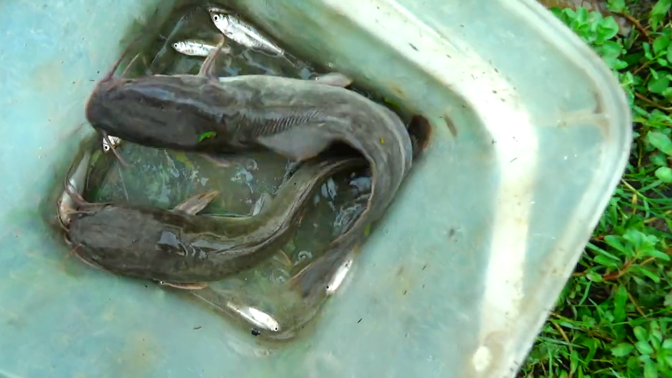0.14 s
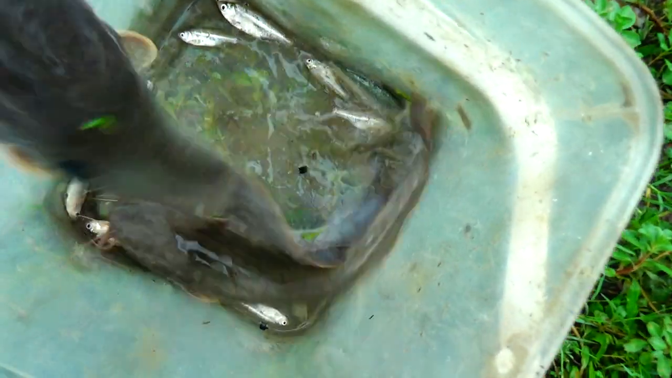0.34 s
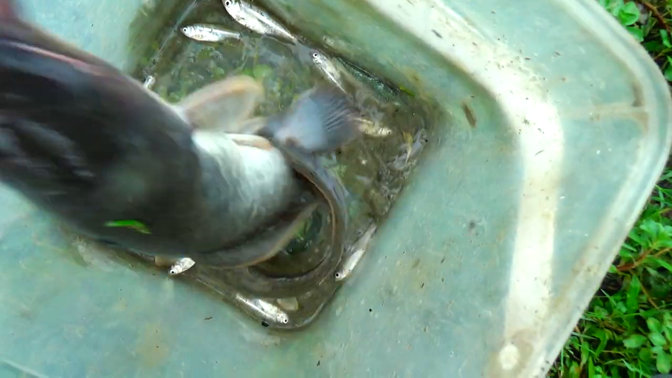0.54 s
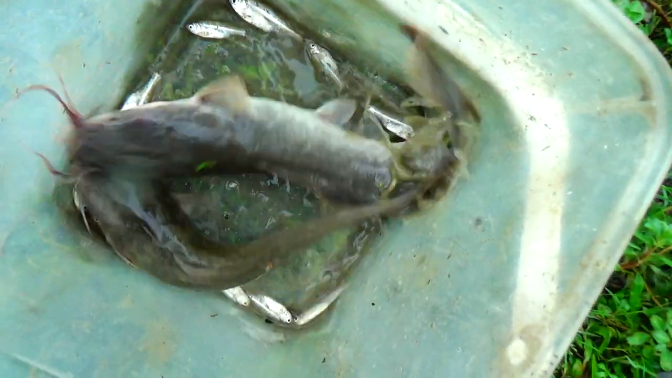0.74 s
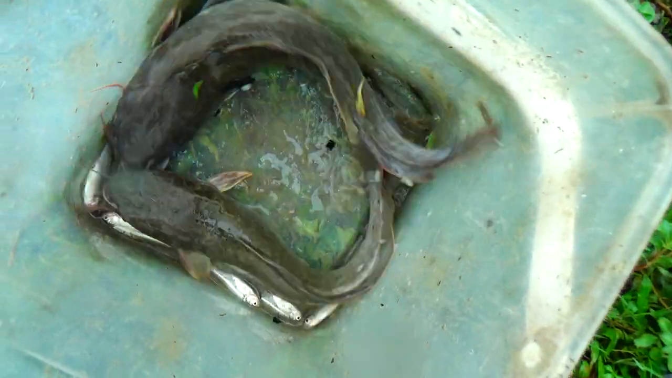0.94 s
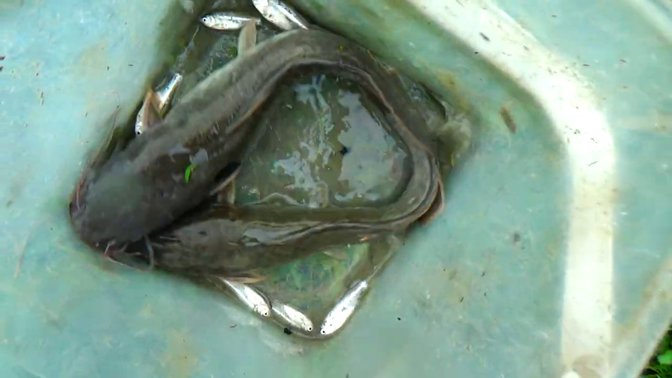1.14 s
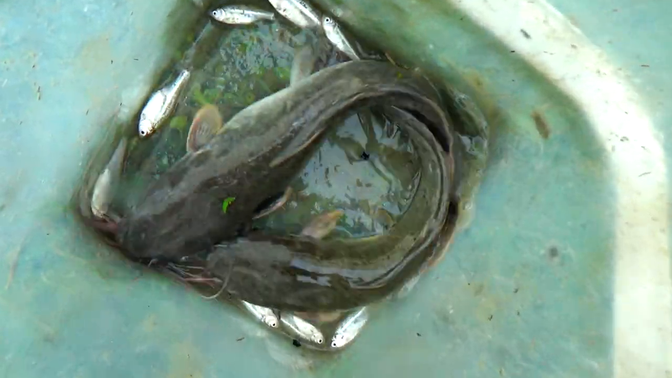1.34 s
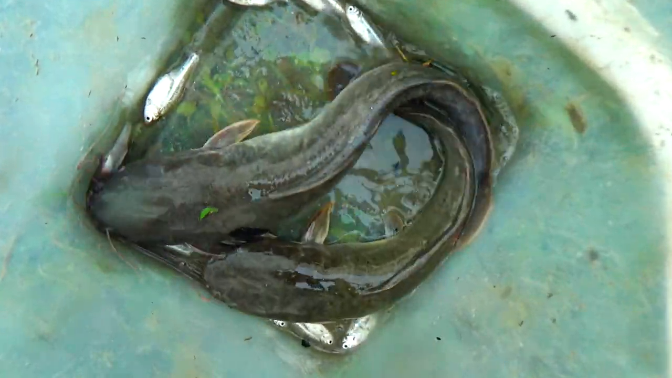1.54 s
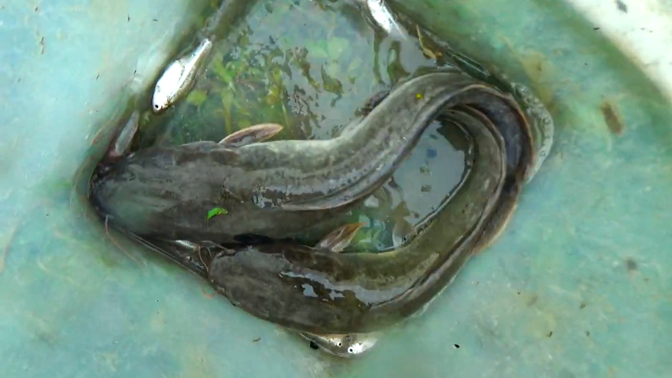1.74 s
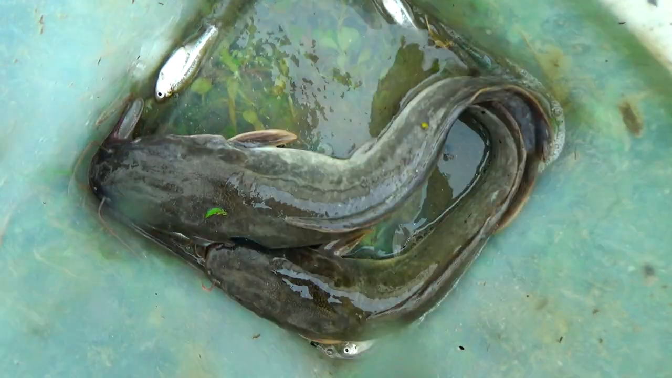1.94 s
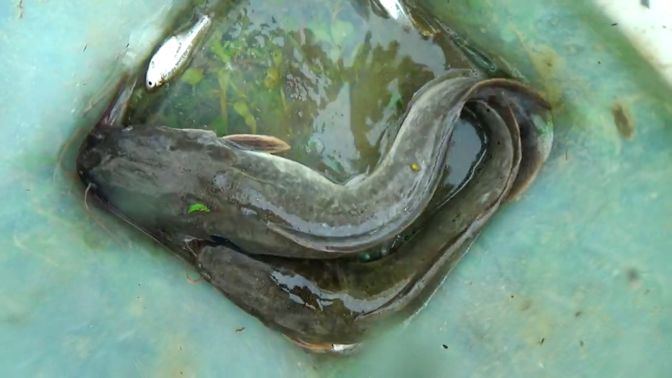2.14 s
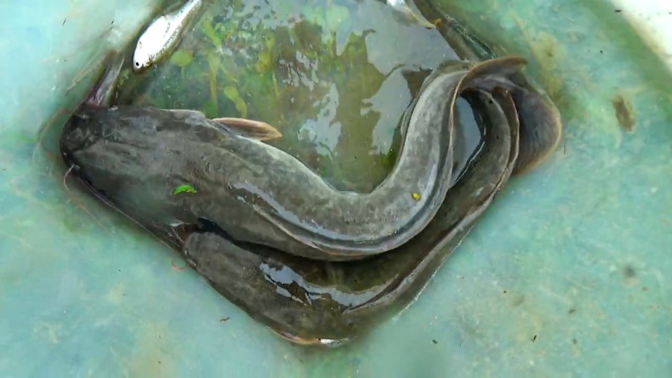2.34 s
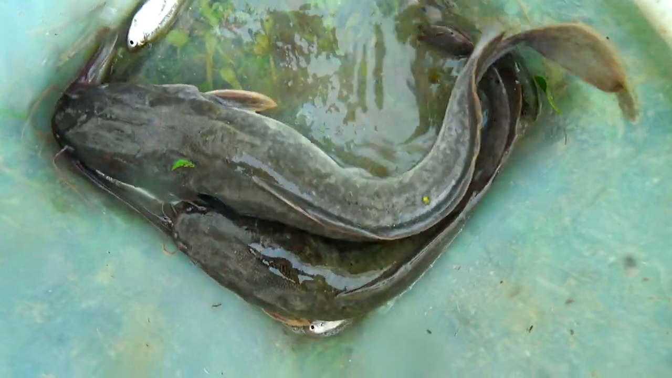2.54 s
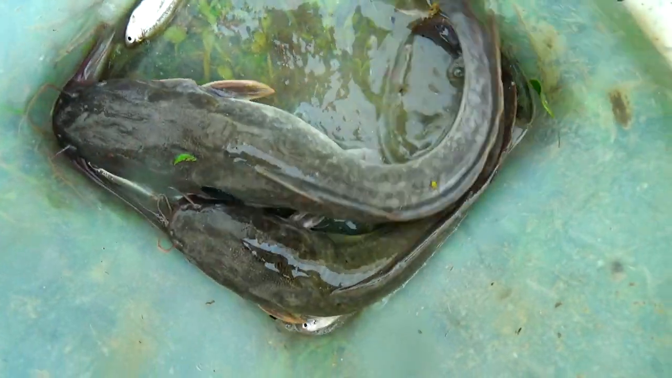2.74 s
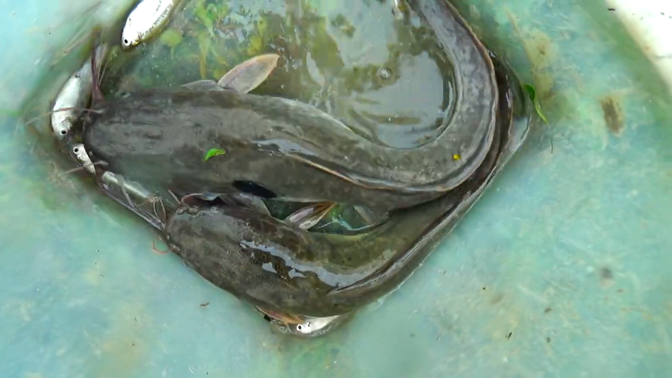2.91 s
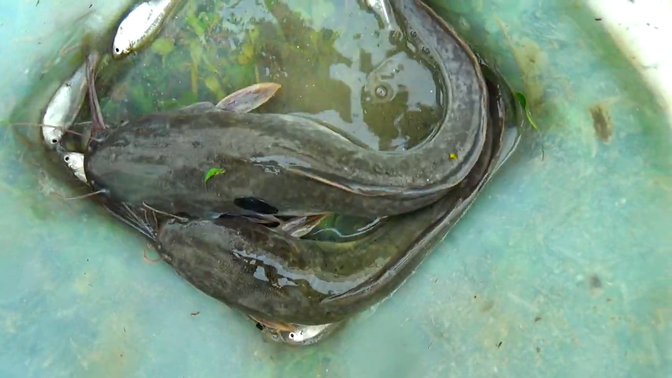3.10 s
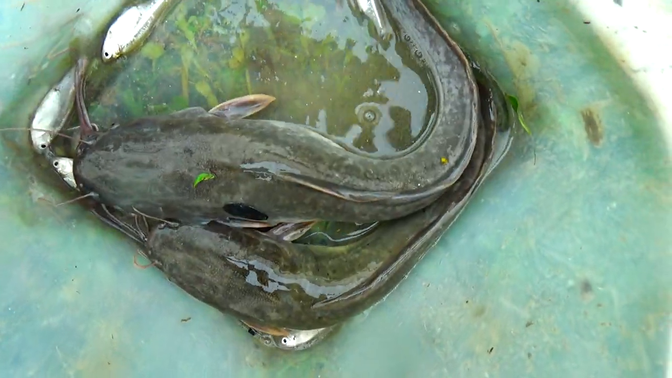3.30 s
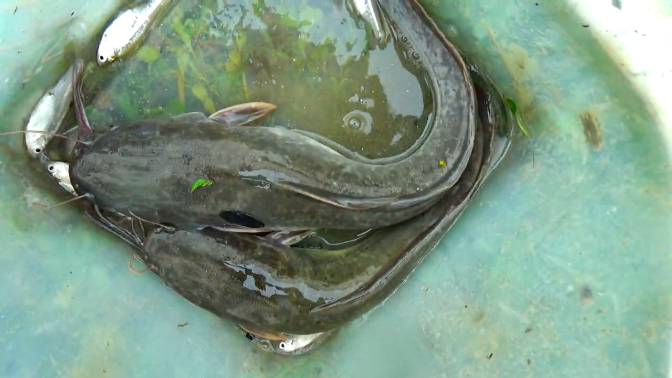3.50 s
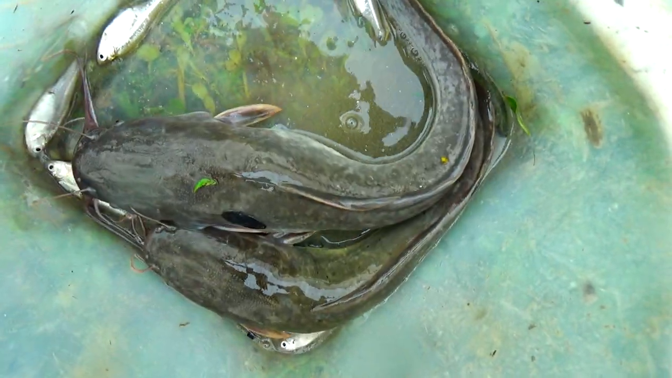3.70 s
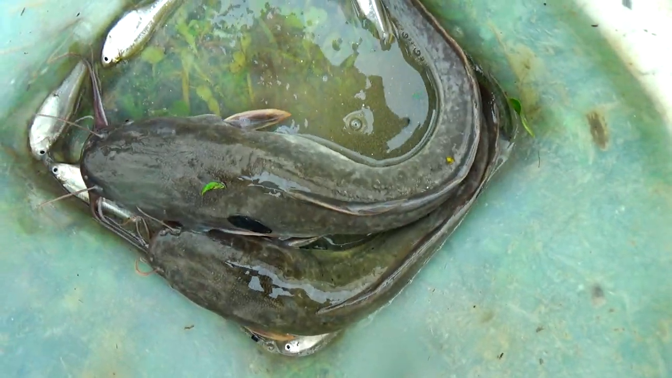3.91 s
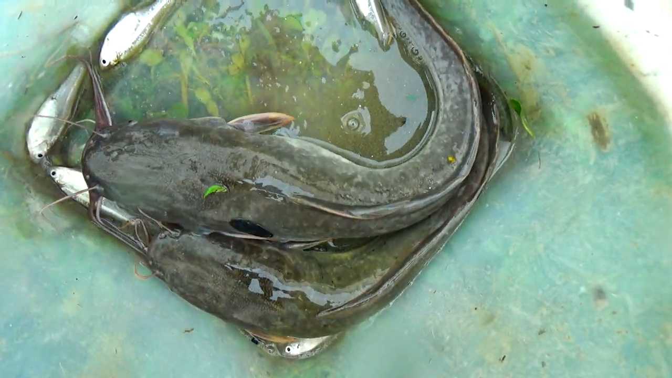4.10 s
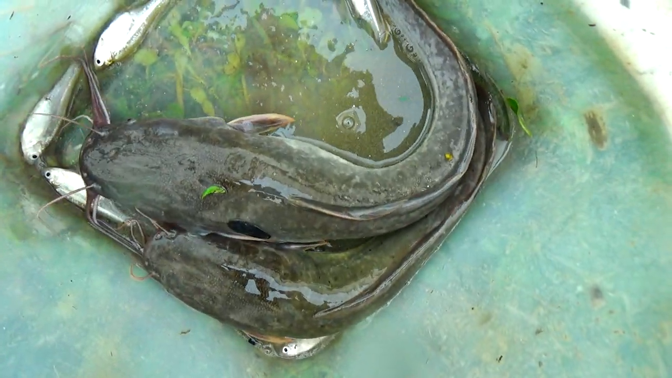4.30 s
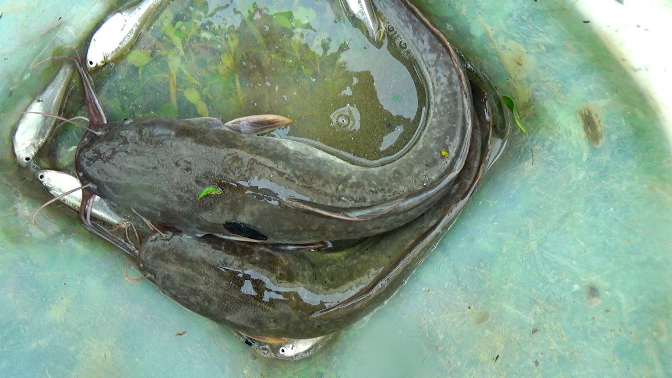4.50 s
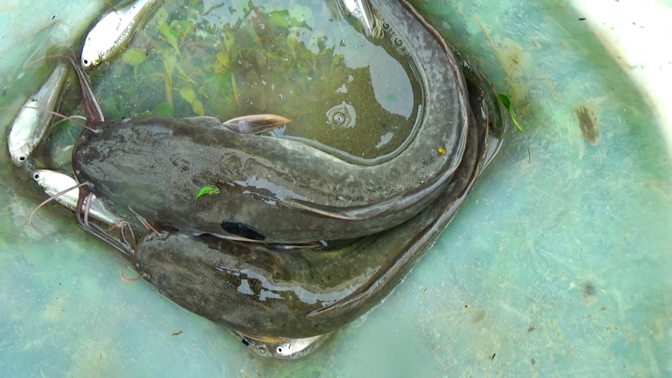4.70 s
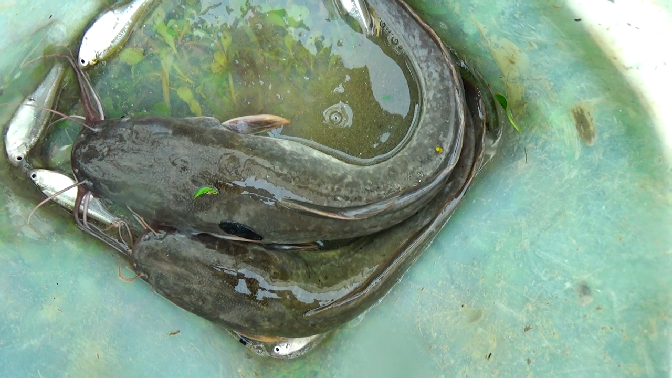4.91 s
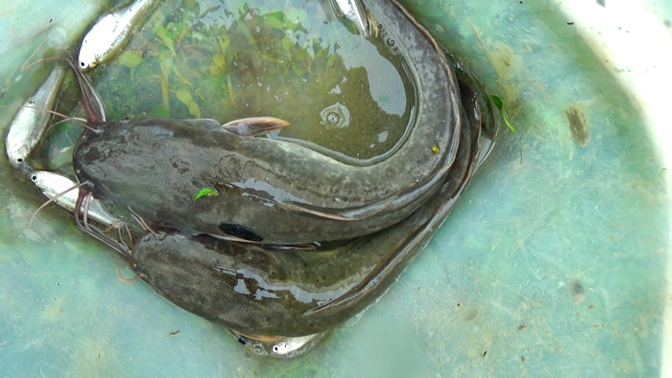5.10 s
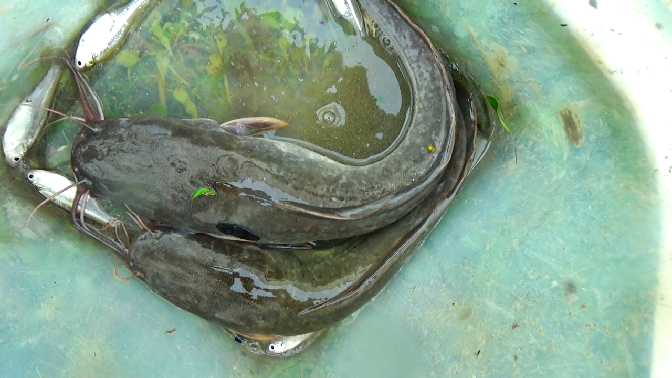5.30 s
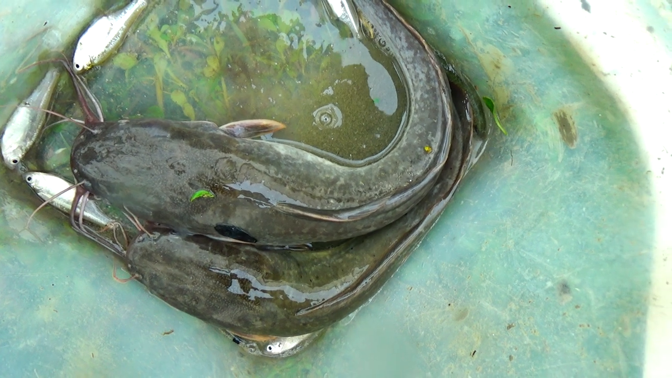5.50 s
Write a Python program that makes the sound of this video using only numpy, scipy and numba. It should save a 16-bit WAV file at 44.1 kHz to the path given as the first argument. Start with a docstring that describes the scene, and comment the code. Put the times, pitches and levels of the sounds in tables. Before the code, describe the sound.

Close stereo sound over a shallow plastic tub outdoors, about 5.5 seconds. Small wet clicks open, then at 0.18 a low, slightly left-leaning double thump begins the thrashing. From 0.25 to 0.95 come rapid sharp slaps, booming body hits, gurgles and bright bubbly spray, strongest around 0.3-0.4 and 0.6-0.85, with short boxy reflections. Drips patter and fade by 1.15, water running off into faint fizz. From 1.2 to 2.2 a bird, left of centre, sings five separate shaky gliding notes, then seven steeply falling whistles about every 0.22 seconds from 2.35 to 3.7, echoing from ground and trees; a very faint note follows at 3.9. A thin high insect chirps rapidly from about 1.2 onward. Small wet smacks come near 2.54 and 2.8-2.86, with a soft thump; fainter ticks near 3.6, 4.05 and 5.45. Quiet distant rumble and airy hiss continue throughout.

```python
"""A shallow plastic tub outdoors: two catfish thrash for a second, then settle with a few wet smacks and drips.
Their bodies thump the floor and trap air, which booms; torn water cracks and sprays as swarms of tiny bubbles,
each a short sine that rises in pitch, and all of them echo between the walls.
A bird sings gliding notes and a run of falling whistles, and an insect chirps, both shaky pure tones.
Behind them lies filtered noise: a low, distant rumble under airy hiss."""
import sys
import numpy as np
from scipy import signal
from scipy.fft import rfft, irfft
from scipy.io import wavfile
from scipy.ndimage import uniform_filter1d
from numba import njit

SR = 44100
rng = np.random.default_rng(int(sys.argv[2]) if len(sys.argv) > 2 else 0)


def file_out(sig):
    """Save sig as 16-bit WAV at sys.argv[1]."""
    # one column per channel
    cols = np.atleast_2d(sig).T
    # limit, then scale
    lim = np.clip(cols, -1, 1)
    pcm = np.round(lim * 32767).astype(np.int16)
    wavfile.write(sys.argv[1], SR, pcm)


N = 244755
T = np.arange(N) / SR  # time of every sample, s


def undb(db):
    """Turn decibels into a plain factor."""
    return 10 ** (np.asarray(db) / 20)


def unit(x):
    """Scale to an average strength (rms) of 1."""
    return x / np.sqrt(np.mean(x ** 2) + 1e-20)


def add(out, s, x):
    """Mix x into out from time s."""
    i = max(int(s * SR), 0)
    out[..., i:i + x.shape[-1]] += x[..., :N - i]


def pan(x, db):
    """Place a sound by its left minus right level."""
    return x * undb([[db / 2], [-db / 2]])


def band(x, lo_hz, hi_hz, order=2):
    """Keep the pitches between two limits."""
    limits_hz = [lo_hz, min(hi_hz, SR / 2 - 1)]
    return signal.sosfilt(signal.butter(order, limits_hz, "band", fs=SR, output="sos"), x)


def colour(x, points):
    """Filter by a curve of (pitch_hz, level_db) points."""
    hz, db = np.transpose(points)
    f = np.maximum(np.fft.rfftfreq(len(x), 1 / SR), 1)
    gain_db = np.interp(np.log(f), np.log(hz), db)
    return irfft(rfft(x) * undb(gain_db), len(x))


def walk(rate):
    """Smooth random wander around 0 with a spread near 1, drawing rate new values a second."""
    k = int(SR / rate)
    steps = np.repeat(rng.standard_normal(N // k + 1), k)
    return unit(uniform_filter1d(steps, k)[:N])


def diffuse(mid, side):
    """Left and right of a sound that arrives from all around, made of two unrelated noises."""
    # how much left and right differ, by pitch: pitch_hz [Hz], side_minus_mid_db [dB]
    side_curve = [(150, -21), (700, 1), (8100, -5), (15000, -16)]
    return mid + colour(side, side_curve) * np.array([[1], [-1]])


def echoes(x, t60, lag_s):
    """Dense reflections: noise that starts after lag_s and fades by 60 dB in t60 seconds, of about unit energy."""
    t = T[:SR]
    fading = rng.standard_normal((2, SR)) * undb(-60 * t / t60) * (t > lag_s)
    tail = diffuse(*unit(fading))
    return signal.fftconvolve(np.atleast_2d(x), tail / np.sqrt(SR), axes=1)[:, :N]


def tub_air(x):
    """The air between the walls rings on a few pitches when the water sounds excite it."""
    # ringing of the air: pitch_hz [Hz], t60_s [s to fade by 60 dB], level_db [dB at the centre pitch]
    air_modes = [(363, 0.03, 10), (880, 0.17, 2), (1797, 0.075, 4), (1940, 0.039, -1), (3130, 0.022, 5)]
    out = 0
    for hz, t60, db in air_modes:
        sharpness = hz * t60 * np.pi / np.log(1000)
        out = out + undb(db) * signal.lfilter(*signal.iirpeak(hz, sharpness, fs=SR), x)
    return out


@njit
def bubbles(length, start, hz, cycles, size, glide):
    """Sines that swell quickly and rise in pitch as they die; size sets their energy."""
    out = np.zeros(length)
    for k in range(len(start)):
        n, first, phase = int(cycles[k] * SR / hz[k]) + 2, int(start[k] * SR), 0.
        for i in range(min(n, length - first)):
            age = i / n
            phase += 2 * np.pi * hz[k] * (1 + glide * (age - 1 / 4)) / SR
            swell = age * age * np.exp(-11. * age)
            out[first + i] += size[k] * np.sin(phase) * swell / np.sqrt(n)
    return out


def cloud(length, start, lo_hz, hi_hz, cycles, scatter_db, glide=0.35):
    """Bubbles of random pitch, life and size at the given times."""
    pitch, life, size = rng.random((len(start), 3)).T
    hz = lo_hz * (hi_hz / lo_hz) ** pitch
    gain = undb(-scatter_db * np.log(1 - .99 * size))  # many small ones, few large
    return bubbles(length, start, hz, cycles * 4 ** (life - .5), gain, glide)


def plop(hz, ring_s, glide):
    """One bubble swells, rings for ring_s and rises in pitch by its glide; peak 1."""
    cycles = np.full(1, float(hz * ring_s))
    x = bubbles(SR // 10, np.zeros(1), np.full(1, float(hz)), cycles, np.ones(1), float(glide))
    return x / abs(x).max()


def note(hz, db, waver=.005, flutter_db=3.5):
    """A near-pure whistle along a pitch curve, its pitch and level slightly shaky."""
    shake = unit(band(rng.standard_normal(SR // 4), 22, 240))[:len(hz)]
    phase = 2 * np.pi * np.cumsum(hz * (1 + waver * shake)) / SR
    level = undb(db + flutter_db * shake[::-1])
    return np.sqrt(2) * np.sin(phase) * level * signal.windows.tukey(len(hz), .14)


def yard(yard_db=-47.5):
    """Nearly steady distant rumble under smooth air hiss, and a high hiss that swells twice."""
    # tone of the outdoor background: pitch_hz [Hz], level_db [dB per Hz, only the shape counts]
    yard_curve = [(20, -32), (43, -4), (149, -2.5), (249, -10.5), (340, -6), (463, -18), (1070, -23),
                  (4250, -34.5), (7800, -33.5), (9700, -32), (12000, -39), (15500, -42)]
    # swells of the high hiss: top_s [s at the top], half_width_s [s], level_db [dB at the top]
    hiss_swells = [(2.15, 0.22, -59), (3.45, 0.3, -62)]
    noises = (unit(colour(x, yard_curve)) for x in rng.standard_normal((2, N)))
    air = diffuse(*noises) * undb(yard_db + .5 * walk(12))
    swell = sum(undb(top_db) / (1 + ((T - s) / half_s) ** 2) for s, half_s, top_db in hiss_swells)
    hiss = unit(band(rng.standard_normal((2, N)), 9200, 10400, order=1))
    return air + diffuse(*hiss) * swell


def insect(level_db=-61.5, gap_s=0.018, period_s=.097, stroke_s=.013, top_hz=9200, end_hz=8600, count=52):
    """After a second, about ten uneven chirps a second, each two short wing strokes that slant down in pitch."""
    out = np.zeros(N)
    times = 1.15 + np.cumsum(period_s * rng.uniform(.65, 1.35, count))
    slant = np.linspace(top_hz, end_hz, int(stroke_s * SR))
    for s in times[times < T[-1] - 2 * gap_s]:
        for stroke in range(2):
            pitch, db = rng.normal([1, 0], [.008, 2])  # no two strokes quite alike
            add(out, s + stroke * gap_s, note(slant * pitch, db))
    return out * undb(level_db)


def gliding_notes(swell_db=11.5):
    """The bird's separate notes follow drawn pitch curves and swell over their first half."""
    # five opening notes and a faint last one: level_db [dB before colour and trim],
    # contour [list of time_s [s], pitch_hz [Hz]]
    gliding = [(-48, [(1.225, 4450), (1.25, 4150), (1.3, 3990), (1.32, 3050), (1.345, 2320)]),
               (-46, [(1.485, 4050), (1.52, 4360), (1.537, 3396), (1.565, 2430)]), (-40.5, [(1.695, 4460),
               (1.741, 4300), (1.751, 4800), (1.776, 4910), (1.795, 4130)]), (-41.5, [(1.915, 4170),
               (1.95, 4445), (1.972, 4820)]), (-39, [(2.132, 5300), (2.146, 4550), (2.178, 3914),
               (2.222, 1950)]), (-48, [(3.9, 1947), (3.97, 2120)])]
    out = np.zeros(N)
    for db, contour in gliding:
        s, hz = np.transpose(contour)
        at = np.arange(s[0], s[-1], 1 / SR)
        swell = swell_db * np.minimum(2 * np.linspace(0, 1, len(at)) - 1, 0)
        add(out, s[0], note(np.interp(at, s, hz), db + swell))
    return out


def falling_whistles(whistle_s=.082, drop_hz_per_s=100000, glide_hz=3325, sag_hz_per_s=18500):
    """Each whistle drops steeply from its top onto a slower glide, which starts at glide_hz and sags."""
    # the run of whistles: start_s [s], top_hz [Hz], level_db [dB before colour and trim]
    whistles = [(2.347, 5860, -41), (2.566, 4855, -42), (2.769, 5545, -42), (2.989, 5700, -42.5),
                (3.203, 4730, -43.5), (3.425, 4750, -45), (3.646, 4910, -44)]
    out, t = np.zeros(N), T[:int(whistle_s * SR)]
    for s, top_hz, db in whistles:
        above_hz = top_hz - glide_hz
        hz = glide_hz - sag_hz_per_s * t + above_hz * np.exp(-t * drop_hz_per_s / above_hz)
        add(out, s, note(hz, db, waver=.017))
    return out


def bird(level_db=-3, far_db=-5.0, near_db=-6.5):
    """Gliding notes and a run of falling whistles, thrown back by the ground and, duller, by the trees."""
    # some pitches of the song carry better than others: pitch_hz [Hz], level_db [dB]
    bird_colour = [(1950, -6), (2110, -15), (2280, 0.5), (2560, -3), (2750, 0), (3080, -5), (3280, 3.5),
                   (3520, -4.5), (3850, 5), (4500, -3), (5350, -10), (5750, -4)]
    song = colour(gliding_notes() + falling_whistles(), bird_colour)
    dulled = band(song, 20, 3700)
    trees = undb(far_db) * echoes(dulled, t60=2.4, lag_s=0.039)
    ground = undb(near_db) * echoes(song, t60=0.13, lag_s=0.0054)
    return undb(level_db) * (pan(song, -8.0) + ground + trees)


def froth(level_db=-56, fade_db_per_s=4, count=900):
    """Leftover foam fizzes away ever more quietly, as small bubbles at random times."""
    x = cloud(N, rng.uniform(0, T[-1], count), 4500, 12000, cycles=8, scatter_db=2.5)
    return unit(x) * undb(level_db - fade_db_per_s * T)


def drips(first_s=.83, last_s=1.14, level_db=-19, fade_db_per_s=62, count=24):
    """Flung water falls back as fine drips of uneven strength that grow fainter overall."""
    out = np.zeros(N)
    spacing_s = (last_s - first_s) / count
    for s, (early, pitch, size) in zip(np.linspace(first_s, last_s, count), rng.random((count, 3))):
        db = level_db - fade_db_per_s * (s - first_s) - 14 * size
        drip = plop(10000 - 7500 * pitch ** 2, .003, .15)
        add(out, s - early * spacing_s, undb(db) * drip)
    return out


def stir(attack_s=.01, drop_t60_s=.09, runoff_db=-12, runoff_t60_s=0.87):
    """Slosh and spray of all strokes: each swells, holds, drops quickly and runs off slowly."""
    # tail strokes that stir the water: start_s [s], length_s [s],
    # slosh_db and spray_db [dB, before the churn sets the balance]
    strokes = [(0.172, 0.1, -42.5, -43.5), (0.302, 0.16, -39.5, -30), (0.359, 0.042, -40, -26.5),
               (0.411, 0.09, -36, -39.5), (0.616, 0.066, -38.5, -21), (0.694, 0.053, -29.5, -24),
               (0.774, 0.057, -29.5, -26.5), (0.897, 0.073, -43, -44), (5.401, 0.013, -49, -55)]
    power = np.zeros((2, N))
    for s, length, slosh_db, spray_db in strokes:
        after = np.maximum(T - s - length, 0)
        drop = undb(-60 * after / drop_t60_s)
        runoff = undb(runoff_db - 60 * after / runoff_t60_s)  # water running back
        shape = np.clip((T - s) / attack_s, 0, 1) * np.maximum(drop, runoff)
        power += (undb([[slosh_db], [spray_db]]) * shape) ** 2
    return np.sqrt(power)


def churn(gurgle_db=-8, slosh_db=-7, spray_db=-6.0, medium_db=0, mist_db=-9, count=9000):
    """Stirred water gurgles, sloshes and sprays: rising bubbles of all sizes, the smaller in quick uneven spurts."""
    slosh, spray = stir()
    out = 0
    for side_db in (1.5, -1.5):  # two separate swarms, a little left and a little right
        start = rng.uniform(0, T[-1], count)
        deep = cloud(N, start[::10], 86, 535, cycles=6.4, scatter_db=2.5)
        large = cloud(N, start[::6], 520, 2600, cycles=8, scatter_db=3.5)
        medium = cloud(N, start[1::3], 1600, 6800, cycles=16, scatter_db=4)
        fine = cloud(N, start, 6100, 10150, cycles=22, scatter_db=4)
        mist = cloud(N, start, 10000, 14700, cycles=10, scatter_db=5)
        drops = unit(undb(medium_db) * unit(medium) + unit(fine) + undb(mist_db) * unit(mist))
        splash = unit(large) * slosh * undb(slosh_db) + drops * spray * undb(spray_db)
        splash = splash * undb(2.5 * walk(170))  # the spurts
        gurgle = unit(deep) * slosh * undb(gurgle_db)
        out = out + pan(splash, side_db) + pan(gurgle, 6.5 + side_db)
    return out


def plops(ring_s=.008, glide=0.16, level_db=-1):
    """Single drops and bubbles ring briefly and rise in pitch; one lasts and rings on a steady pitch."""
    # single drops and bursting bubbles, some in quick pairs:
    # start_s [s], level_db [dB before the overall trim], pitch_hz [Hz]
    single_plops = [(0.605, -12, 4440), (0.658, -13.5, 2560), (0.748, -13.5, 9600), (0.769, -21, 4570),
                    (0.816, -15, 3690), (0.847, -16.5, 6900), (0.8728, -13.5, 6150), (0.8735, -11, 8540),
                    (0.892, -22.5, 2418), (0.9472, -17, 9700), (0.958, -29.5, 1100), (1.389, -36, 2320),
                    (1.47, -33.5, 2030), (1.917, -36.5, 1870), (2.857, -26, 2900), (5.322, -39.5, 2060)]
    # a bubble that stays whole: start_s [s], level_db [dB], pitch_hz [Hz], life_s [s]
    lasting_bubble = (0.94, -41, 2940, .085)
    out = np.zeros(N)
    for s, db, hz in single_plops:
        add(out, s, undb(db + level_db) * plop(hz, ring_s, glide))
    s, db, hz, life_s = lasting_bubble
    add(out, s, undb(db) * plop(hz, life_s, 0))
    return out


def burst(lo_hz, hi_hz, cycles, spread_s, count):
    """A handful of bubbles of related size, born almost together; rms 1 if packed into 5 ms."""
    start = spread_s * rng.gamma(2, size=count) * np.linspace(.2, 1, count)
    centre = lo_hz * (hi_hz / lo_hz) ** rng.random()
    low, high = np.sqrt(lo_hz * centre), np.sqrt(hi_hz * centre)
    return unit(cloud(SR // 10, start, low, high, cycles, scatter_db=0.5)) / np.sqrt(20)


def smacks(crack_db=-2, large_db=-4, medium_db=-4.5, fine_db=-15, mist_db=-30, spread_s=.0025):
    """A water film tears: a sharp crack, then a burst of large, medium and fine bubbles and a little mist."""
    # wet smacks of skin and water: start_s [s], level_db [dB],
    # depth_db [dB: the deeper the water, the more big bubbles]
    smack_table = [(0.036, -13.5, -22), (0.0441, -15, -13.5), (0.1589, -26, 2), (0.2582, -12, -41),
                   (0.3148, -7.5, -31), (0.327, -8.5, -15.5), (0.3454, -6.5, -18), (0.3621, -20, -9),
                   (0.373, -6, -21), (0.4, -8.5, -23), (0.498, -16, -25), (0.5053, -10.5, -8.5),
                   (0.530, -14, -32), (0.538, -12, -30), (0.5577, -6.5, -19), (0.578, -13.5, -14),
                   (0.6031, -7.5, -25), (0.6279, -9, -29), (0.681, -7.5, -24), (0.7038, -8, -13.5),
                   (0.726, -10.5, -9), (0.7411, -8.5, -14), (0.7941, -8.5, -12), (0.801, -7, -29),
                   (0.8105, -14.5, -8.5), (0.919, -12.5, -28), (0.933, -14, -45), (0.9872, -13.5, -26),
                   (1.1473, -26, -12.5), (1.163, -27, -34), (1.522, -26.5, -15), (2.53, -30, -25),
                   (2.5402, -20.5, -20.5), (2.574, -36, -34), (2.799, -27, -36), (2.816, -22.5, -17.5),
                   (2.834, -29, -33), (2.858, -16, -27), (3.05, -32.5, -6), (3.594, -31.5, -31),
                   (4.0538, -28, -37), (5.01, -48.5, -1), (5.451, -43.5, 1), (5.459, -43, -36)]
    out = np.zeros((2, N))
    for s, db, depth in smack_table:
        tear_s = spread_s * undb(0.33 * db)  # a small film tears sooner
        x = undb(crack_db) * plop(rng.uniform(5500, 9000), .0014, 0)
        x += undb(depth + large_db) * burst(400, 2600, cycles=3.5, spread_s=2 * tear_s, count=10)
        x += undb(depth + medium_db) * burst(1460, 7300, cycles=8.5, spread_s=1.3 * tear_s, count=10)
        x += undb(fine_db) * burst(5600, 11200, cycles=9, spread_s=tear_s, count=10)
        x += undb(mist_db) * burst(6900, 16000, cycles=10, spread_s=tear_s, count=20)
        add(out, s, x * undb(db))
    return out


def thumps(t60=0.045, rise_s=0.0017, ring_db=-8, level_db=-1, left_db=6, push_s=0.0019, left_lag_s=0.00025):
    """Each blow squeezes a pocket of air, which booms; the deep, heavy ones also set the floor ringing most."""
    # bodies hitting the wet floor: start_s [s], level_db [dB before the overall trim],
    # pitch_hz [Hz, of the trapped air]
    blows = [(0.1835, -7.5, 150), (0.1908, -9, 332), (0.325, -13, 200), (0.335, -12, 121),
             (0.361, -18, 135), (0.432, -25, 112), (0.507, -16, 325), (0.57, -20, 325), (0.691, -17, 118),
             (0.741, -20, 355), (0.81, -12.5, 320), (0.838, -21, 130), (2.82, -22, 382), (4.231, -37, 300)]
    # the loaded tub floor: pitch_hz [Hz], t60_s [s to fade by 60 dB], level_db [dB before ring_db]
    floor_modes = [(100.3, 0.2, 10), (347.6, 0.21, -4), (456, 0.11, -1), (940, 0.037, 17.5)]
    out, t = np.zeros((2, N)), T[:SR // 3]
    push = np.sin(np.pi * np.minimum(t / push_s, 1)) ** 2  # soft flesh spreads the force in time
    floor = sum(undb(db - 60 * t / ring_s) * np.sin(2 * np.pi * hz * t) for hz, ring_s, db in floor_modes)
    floor = signal.fftconvolve(floor, push / push.sum())[:len(t)]
    for s, db, hz in blows:
        weight = min(1, 170 / hz) ** 2
        boom = np.sin(2 * np.pi * hz * t) * undb(-60 * t / t60) * (1 - np.exp(-t / rise_s))
        blow = boom / abs(boom).max() + weight * undb(ring_db) * floor
        add(out, s, pan(blow * undb(db + level_db), left_db * np.sqrt(weight)))
    late_left = np.interp(T - left_lag_s, T, out[0])
    return band(np.array([late_left, out[1]]), 103.5, 940)


def scene(wall_db=-8, air_db=-3, wall_top_hz=6000):
    """The water sounds pass through the tub, whose walls return little treble; bird, insect and yard lie outside it."""
    outside = yard() + insect() + bird()
    water = froth() + drips() + churn() + plops() + smacks()
    wall_sound = band(water.mean(axis=0), 22, wall_top_hz, order=1)
    walls = undb(wall_db) * echoes(wall_sound, t60=0.092, lag_s=0.00063)
    return outside + water + walls + undb(air_db) * tub_air(water) + thumps()


def record(dry, top_hz=15900):
    """The recorder cuts the top: a steep filter removes what lies above top_hz."""
    return signal.sosfilt(signal.ellip(8, .2, 70, top_hz, fs=SR, output="sos"), dry)


dry = scene()
out = record(dry)
file_out(out)
```